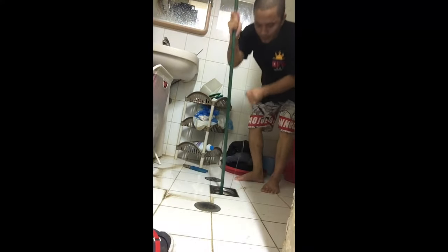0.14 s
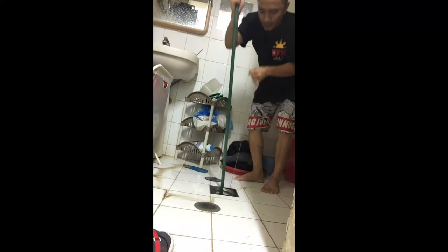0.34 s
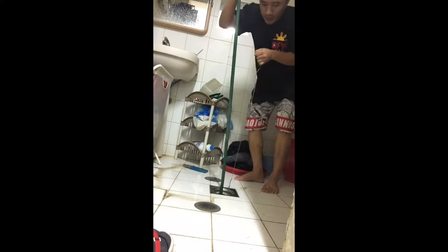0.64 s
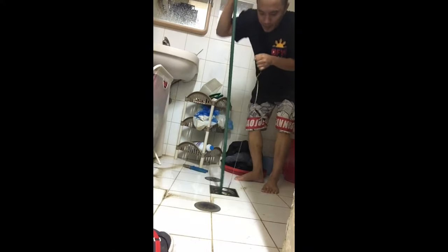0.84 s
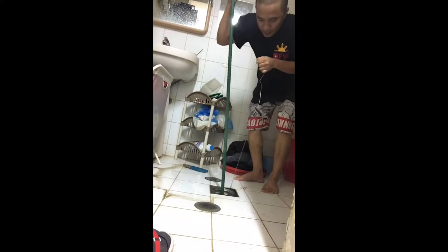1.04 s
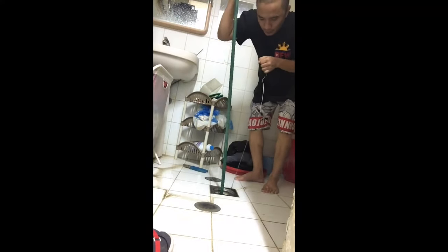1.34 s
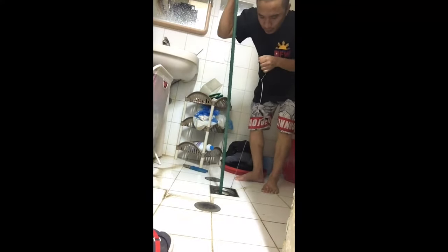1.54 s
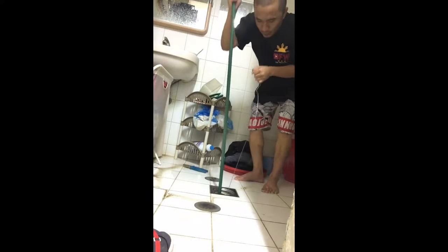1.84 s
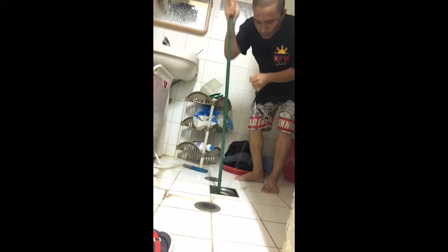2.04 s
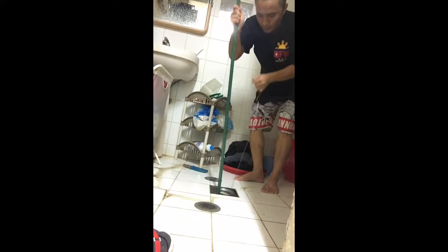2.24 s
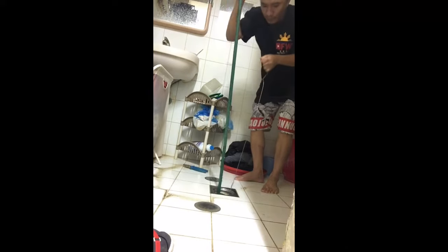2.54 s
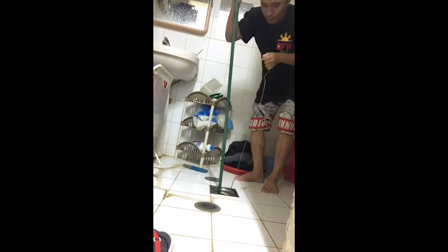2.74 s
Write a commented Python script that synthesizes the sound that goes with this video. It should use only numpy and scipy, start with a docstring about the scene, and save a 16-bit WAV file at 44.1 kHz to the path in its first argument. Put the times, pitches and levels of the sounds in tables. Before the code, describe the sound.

Wet plunging strokes in a blocked drain, with hollow gurgles, splashes, bubbles and rod knocks

```python
"""Plunging a clogged drain

A long rod with a plunger head is worked up and down in a clogged floor drain of a small tiled bathroom.
Strokes drive surges of water and air: clumped random clicks ring the pipe and throat, or are shaped as splash.
Single bubbles are short rising tones; rod knocks are clicks with puffs plus decaying modes of the rod.
A low hum, noise-driven room modes and steady room tone lie underneath.
The hard room rings on for about half a second, as noise echoes decaying band by band."""
import sys
import numpy as np
from scipy import signal
from scipy.fft import rfft, irfft
from scipy.io import wavfile

SR = 44100
rng = np.random.default_rng(int(sys.argv[2]) if len(sys.argv) > 2 else 0)


def volts_from_decibels(level):
    """Turn decibel levels (scalar or array-like) into linear amplitude factors."""
    exponent = np.asarray(level, float) / 20
    return 10 ** exponent


def generate_wav(signal):
    """Clip the signal to [-1, 1] and save it as 16-bit WAV at the path in sys.argv[1]."""
    frames = np.transpose(np.atleast_2d(signal))
    scaled = np.clip(frames, -1, 1) * 32767
    pcm = np.round(scaled).astype(np.int16)
    wavfile.write(sys.argv[1], SR, pcm)


N = 125685


def rms_one(x):
    """Scale to rms 1."""
    return x / np.sqrt(np.mean(x ** 2) + 1e-20)


def in_time(rows):
    """Level and pitch columns of a curve table, per sample."""
    s, *columns = np.transpose(rows)
    return [np.interp(np.arange(N) / SR, s, c) for c in columns]


def at_hz(points, hz):
    """Read a spectrum table on a log frequency axis."""
    table_hz, values = np.array(points).T
    return np.interp(np.log(hz), np.log(table_hz), values)


def fft_hz(n):
    """Bin frequencies, held at 1 Hz or above for the log axis."""
    return np.maximum(np.arange(n // 2 + 1) * SR / n, 1)


def colour(x, spectrum):
    """Shape by a spectrum table; rms 1."""
    return rms_one(irfft(rfft(x) * volts_from_decibels(at_hz(spectrum, fft_hz(len(x)))), len(x)))


def resonate(x, hz, width_hz):
    """Two-pole resonance, gain 1 on top."""
    r = np.exp(-np.pi * width_hz / SR)
    return signal.lfilter([(1 - r * r) / 2, 0, (r * r - 1) / 2],
                          [1, -2 * r * np.cos(2 * np.pi * hz / SR), r * r], x)


def ring_modes(source, level_db, modes):
    """Parallel resonances of alternating sign; the level drives the input, so the ringing outlasts it."""
    def through(x):
        return sum((-1) ** k * volts_from_decibels(gain_db) * resonate(x, hz, width_hz)
                   for k, (hz, width_hz, gain_db) in enumerate(modes))
    return through(source * volts_from_decibels(level_db)) / np.std(through(source))


def churn_db():
    """Uneven churning of the water: twice-smoothed noise as a level in dB."""
    rms_db, corner_hz, settle = 2.5, 48.5, 4000
    r = np.exp(-2 * np.pi * corner_hz / SR)
    slow = signal.lfilter([1], [1, -2 * r, r * r], rng.standard_normal(N + settle))[settle:]
    return rms_db * rms_one(slow)


def grains(rate_per_s, spread_db, hiss):
    """Random clicks of uneven size over a share of plain hiss, in clumps."""
    sizes = volts_from_decibels(spread_db * np.minimum(rng.exponential(1, N), 4)) * rng.choice([-1, 1], N)
    clicks = rms_one(sizes * (rng.random(N) < rate_per_s / SR))
    return rms_one((clicks + hiss * rng.standard_normal(N)) * volts_from_decibels(churn_db()))


# surges before the room: t/s, gurgle reference level/dB, rush level/dB, splash level/dB, spray level/dB
SURGES = [(0.0, -41.0, -35.5, -40, -58), (0.05, -53, -52.5, -52.5, -74), (0.14, -52, -52.5, -52, -67),
          (0.2, -33, -36.0, -35, -44.5), (0.25, -26.5, -38, -38.5, -60), (0.3, -18.5, -21.5, -30.0, -37.5),
          (0.34, -23, -27, -31.0, -45), (0.41, -17.5, -25.0, -24.5, -34), (0.47, -27, -29.5, -40.5, -56),
          (0.55, -38.5, -63, -46.0, -58.0), (0.65, -49.5, -49, -61.5, -76), (0.71, -44, -58, -59.5, -70),
          (0.8, -53.5, -62, -56.5, -72), (1.4, -62, -67.5, -80, -74), (1.52, -41.5, -56.5, -62.0, -60),
          (1.61, -44, -58.0, -62, -72.0), (1.68, -42.5, -57, -65, -69), (1.72, -31, -32.5, -40, -54),
          (1.775, -41.5, -28.5, -27.5, -42), (1.82, -37, -48, -56, -50), (1.87, -49, -51.5, -51.5, -81),
          (1.97, -50, -47.5, -48.5, -60), (2.05, -32.0, -40, -38.0, -55), (2.11, -20, -21.5, -26.5, -30.5),
          (2.17, -27.0, -26.0, -25.5, -41.5), (2.23, -24, -30.0, -34, -47.0), (2.3, -36, -37, -37.5, -54),
          (2.38, -46.5, -60, -46, -57), (2.47, -53.5, -51.5, -46.5, -55), (2.53, -32.5, -42.5, -44.5, -65),
          (2.585, -33, -39, -36.5, -45.5), (2.64, -45, -66, -69, -77), (2.72, -53, -64, -63, -70),
          (2.85, -48.5, -61, -53, -59)]


def surge():
    """Water and air driven through the drain; returns pipe ringing, and the rest."""
    gurgle_db, rush_db, splash_db, spray_db = in_time(SURGES)
    glugs = grains(150, 3.57, 0.56)
    water = gurgle(glugs, gurgle_db) + rush(rush_db) + splash(splash_db) + spray(spray_db)
    return pipe_ringing(glugs, gurgle_db), water


# drain pipe modes: f/Hz, width/Hz, relative level/dB
PIPE_MODES = [(235.3, 11, -2.5), (296.5, 11.2, 1.5), (385, 9.3, -3), (471.6, 5.6, -6), (534.5, 33, -19)]


def pipe_ringing(glugs, level_db):
    """Glugs ring the narrow modes of the pipe."""
    return volts_from_decibels(-1.5) * ring_modes(glugs, level_db, PIPE_MODES)


# broad part of the glugs: f/Hz, relative density level/dB per Hz
GURGLE_SPECTRUM = [(150, -25), (210, -2), (320, -2.5), (450, -12), (620, -11.5), (900, -36.5)]


def gurgle(glugs, level_db):
    """The same glugs as a broad low band."""
    return volts_from_decibels(level_db - 7) * colour(glugs, GURGLE_SPECTRUM)


# drain throat resonances: f/Hz, width/Hz, relative level/dB
THROAT_MODES = [(667, 117, -2.5), (974, 66, 7), (1180, 208, -1.5), (1441, 143, 3.5)]


def rush(level_db):
    """Bursts ring the wide resonances of the drain throat."""
    return ring_modes(grains(600, 4.4, 0.33), level_db, THROAT_MODES)


# splash: f/Hz, relative density level/dB per Hz
SPLASH_SPECTRUM = [(940, -9), (1600, -6.5), (1820, -1.5), (2390, -2), (2810, -4), (3630, -12.5),
                   (4420, -11), (5200, -31.5), (6760, -10), (11400, -120)]


def splash(level_db):
    """Drops as dense clicks with a splash spectrum."""
    return volts_from_decibels(level_db) * colour(grains(2300, 1.68, 0.32), SPLASH_SPECTRUM)


# spray: f/Hz, relative density level/dB per Hz
SPRAY_SPECTRUM = [(3500, -26), (4900, -0.5), (5900, 2), (6700, -4.5), (8200, -7), (10000, -9.5),
                  (12000, -11), (14000, -12), (15700, -13.5)]


def spray(level_db):
    """Finer drops: denser, hissier clicks, mostly treble."""
    return volts_from_decibels(level_db) * colour(grains(9000, 4.2, 1.1), SPRAY_SPECTRUM)


# single big bubbles before the room: t/s, start f/Hz, energy level/dB, t60/s
BIG_BUBBLES = [(.70, 382, -12.5, 0.027), (.715, 490, -18, 0.14), (0.772, 395, -38, 0.042),
               (1.545, 348, -21, 0.067), (1.605, 355, -11, 0.034), (1.615, 537, -20, 0.11),
               (1.765, 313, -4, 0.061), (1.805, 305, -13, 0.14), (2.575, 385, -7.5, 0.098),
               (2.58, 607, -11.5, 0.032), (2.635, 332, -20.5, 0.04)]


def bubbles():
    """Each bubble is a decaying sine, rising in pitch."""
    rise_per_s, attack_s = 0.59, 0.0046   # rise: share of the start pitch
    out, t = np.zeros(N + SR), np.arange(SR // 8) / SR
    for s, hz, db, t60_s in BIG_BUBBLES:
        tone = np.sin(2 * np.pi * hz * (t + rise_per_s * t * t / 2))
        ring = tone * volts_from_decibels(-60 * t / t60_s) * np.minimum(t / attack_s, 1)
        i = int(s * SR)
        out[i:i + len(t)] += volts_from_decibels(db) * ring / np.sqrt(np.sum(ring ** 2))
    return out[:N]


# rod on rim or water, before the room: t/s, energy level/dB, low f/Hz, high f/Hz, rod ring level re puff/dB
ROD_KNOCKS = [(0.073, -22.5, 4080, 15000, -22), (.147, -13, 940, 2500, -27), (0.17, -26, 1540, 6950, -11),
              (0.191, -22, 1200, 9700, -20), (0.3, 7, 1070, 1700, 3), (.8478, 7.5, 254, 9300, 4),
              (1.437, -23.5, 1410, 2600, -16), (1.559, -16.5, 970, 4000, -4),
              (1.650, -12.5, 1090, 3860, -5), (1.704, -5, 257, 3000, 17), (1.742, -2, 1700, 2860, -4),
              (1.759, -13.5, 3600, 10900, -9), (1.911, -10, 3500, 15500, 2),
              (2.018, -18.5, 4480, 15000, -22.5), (2.0788, 6, 1950, 4300, -4), (2.125, 6.5, 900, 4600, -7),
              (2.185, -1, 920, 3500, -19), (2.579, -8, 1820, 3140, -9), (2.781, -20.5, 1810, 7100, 3)]
# rod modes: f/Hz, relative level/dB, t60/s
ROD_MODES = [(330, 2, 0.024), (435, -2.5, 0.041), (680, 2.5, 0.015), (924, -3, 0.042), (1206, 6.5, 0.017),
             (1700, -5.5, 0.016), (2104, -11, 0.045), (3000, -6, 0.017), (3500, -18, .02),
             (4145, -13, 0.041), (4590, -3, 0.014), (5240, -9, 0.024), (7340, -23, 0.012)]


def knocks():
    """Each knock is a click with a short puff, plus the rod modes, heard through its own band."""
    crack_t60_s, crack_corner_hz, mode_spread_db = 0.036, 2500, 1.5
    out, t = np.zeros(N + SR), np.arange(SR // 10) / SR
    dull = np.exp(-2 * np.pi * crack_corner_hz / SR)
    for s, db, low_hz, high_hz, ring_db in ROD_KNOCKS:
        noise = rng.standard_normal(len(t)) * volts_from_decibels(-60 * t / crack_t60_s)
        puff = signal.lfilter([1], [1, -dull], 0.38 * (t == 0) + 0.12 * noise)
        ring = 0
        for k, (hz, mode_db, t60_s) in enumerate(ROD_MODES):
            decay_db = mode_db + rng.normal(0, mode_spread_db) - 60 * t / t60_s
            ring = ring + (-1) ** k * volts_from_decibels(decay_db) * np.sin(2 * np.pi * hz * t)
        band = signal.butter(3, [low_hz, high_hz], "band", fs=SR, output="sos")
        hit = signal.sosfilt(band, rms_one(puff) + volts_from_decibels(ring_db) * rms_one(ring))
        i = int(s * SR)
        out[i:i + len(t)] += volts_from_decibels(db) * hit / np.sqrt(np.sum(hit ** 2))
    return out[:N]


# reverberation: f/Hz, t60/s
TILE_T60 = [(150, 0.44), (400, 0.43), (1000, 0.44), (2800, 0.4), (7000, 0.39), (15000, 0.46)]


def bathroom(x):
    """Dense tile echoes, dying band by band (overlapping octave slopes that add up to one)."""
    wet_db, dry_db, first_echo_s = -2, -2.5, 0.0014
    t = np.arange(int(.7 * SR)) / SR
    white, octave = rfft(rng.standard_normal(len(t))), np.log2(fft_hz(len(t)))
    echoes = 0
    for centre in range(7, 15):
        t60_s = at_hz(TILE_T60, 2 ** centre)
        band = irfft(white * np.clip(1 - abs(octave - centre), 0, 1), len(t))
        echoes = echoes + band * volts_from_decibels(-60 * t / t60_s) / np.sqrt(t60_s)
    echoes = echoes * (t > first_echo_s)
    echoes = echoes / np.sqrt(np.sum(echoes ** 2))
    return volts_from_decibels(dry_db) * x + volts_from_decibels(wet_db) * signal.fftconvolve(x, echoes)[:N]


# low hum, perhaps the rod shuddering: t/s, f/Hz, reference level/dB
HUM_CURVE = [(1.46, 125.9, -57), (1.48, 120.6, -39), (1.488, 129, -73), (1.524, 120.4, -40),
             (1.566, 117.7, -47), (1.622, 119.4, -36), (1.72, 128, -42.5), (1.8, 125, -56)]
# partials 1, 2, ..: level re reference/dB
PARTIALS_DB = [-2, -8, -19, -39]


def hum():
    """A wavering low tone with a few harmonics, faded at both ends."""
    hz, db = in_time(HUM_CURVE)
    t, fade_s = np.arange(N) / SR, 0.036
    gate = np.clip(np.minimum(t - HUM_CURVE[0][0], HUM_CURVE[-1][0] - t) / fade_s, 0, 1)
    phase = 2 * np.pi * np.cumsum(hz) / SR
    tone = sum(volts_from_decibels(g) * np.sin((k + 1) * phase) for k, g in enumerate(PARTIALS_DB))
    return np.sqrt(2) * gate * volts_from_decibels(db) * tone


# low air modes stirred by the strokes, in two lists: t/s, lowest mode level/dB, second mode level/dB
BOOM_CURVE = [
    [(0.0, -57, -48), (0.346, -43.5, -58), (0.432, -36, -31), (0.496, -39, -39.5), (1.016, -56.5, -59.5),
     (1.248, -52.5, -66), (1.276, -48.5, -74), (1.376, -52.5, -78), (1.45, -48, -58.5)],
    [(1.8, -49, -52), (2.042, -50, -45.5), (2.18, -37, -48), (2.364, -59, -47), (2.424, -45, -68),
     (2.6, -61, -46), (2.626, -51, -78), (2.814, -49, -68), (2.85, -63, -63)],
]
# the two modes: f/Hz; width/Hz
MODE_HZ = [64.5, 121.15]
MODE_WIDTH_HZ = [10.2, 11.3]


def boom():
    """Noise twice through each low room mode."""
    levels_db = in_time(BOOM_CURVE[0] + [(1.68, -56, -49)] + BOOM_CURVE[1])
    out = 0
    for db, hz, width_hz in zip(levels_db, MODE_HZ, MODE_WIDTH_HZ):
        once = resonate(rng.standard_normal(N + SR), hz, width_hz)
        out = out + volts_from_decibels(db) * rms_one(resonate(once, hz, width_hz)[SR:])   # first second: settling
    return out


# room tone: f/Hz, relative density level/dB per Hz
ROOM_TONE = [(53, -17), (90, -5), (119, -5), (183, -12.5), (265, -17), (408, -21), (970, -22.5),
             (2500, -28.5), (5000, -32), (6000, -32.5), (7500, -35.5), (11000, -38), (15700, -36)]


def room_tone():
    """Steady shaped noise."""
    return volts_from_decibels(-51.5) * colour(rng.standard_normal(N), ROOM_TONE)


def scene():
    """Drain and rod in the room, over booms, hum and room tone; pipe ringing bypasses the echoes."""
    pipe, water = surge()
    in_room = bathroom(water + bubbles() + knocks())
    return (pipe + in_room + hum() + boom() + room_tone())[None]


def low_pass(x):
    """Removes everything above the highest recorded frequency."""
    return signal.sosfilt(signal.butter(12, 15810, fs=SR, output="sos"), x)


# phone microphone response: f/Hz, level/dB
MIC_RESPONSE = [(20, -12), (45, 0), (4500, -0.5), (5050, -2.5), (5600, -1.5), (9800, -4.5), (10500, -9),
                (11200, -5), (15600, -9), (15900, -70)]


def record(dry):
    """Phone microphone colour, applied to the finished mix."""
    mix = irfft(rfft(dry) * volts_from_decibels(at_hz(MIC_RESPONSE, fft_hz(N))), N)
    return low_pass(mix)


dry = scene()
out = record(dry)
generate_wav(out)
```